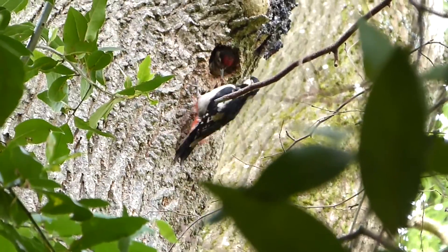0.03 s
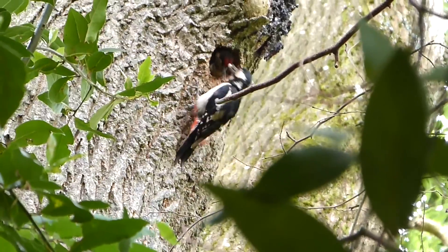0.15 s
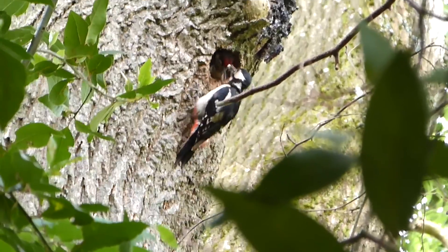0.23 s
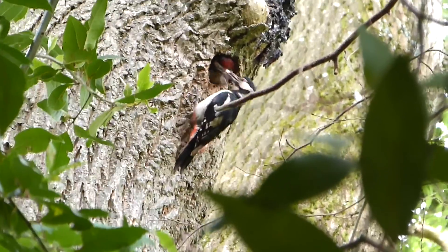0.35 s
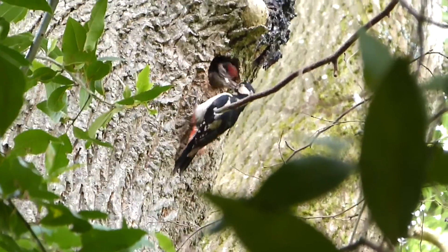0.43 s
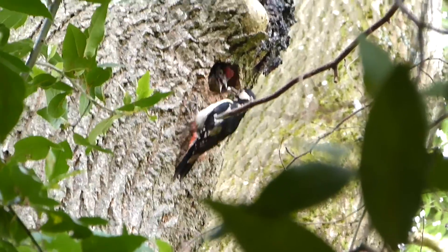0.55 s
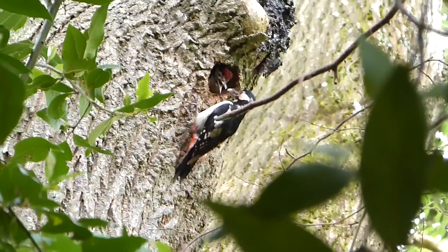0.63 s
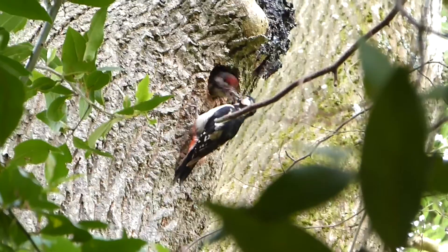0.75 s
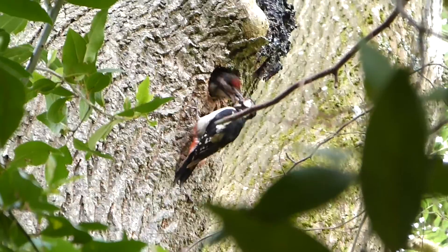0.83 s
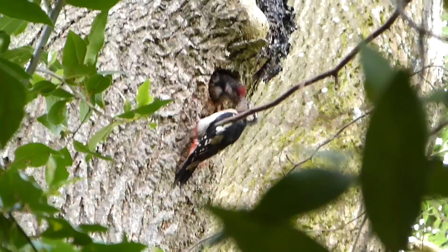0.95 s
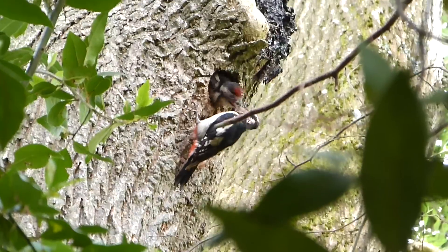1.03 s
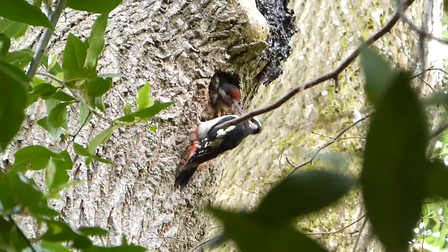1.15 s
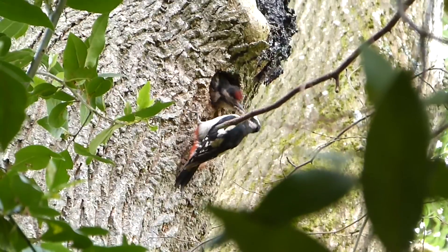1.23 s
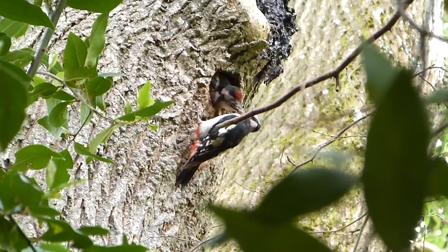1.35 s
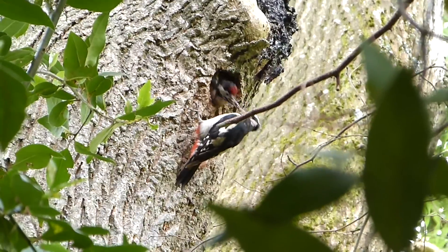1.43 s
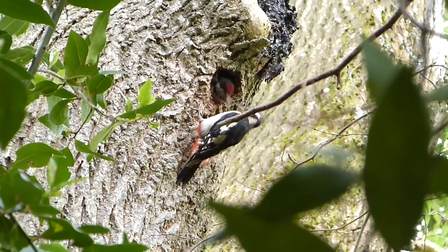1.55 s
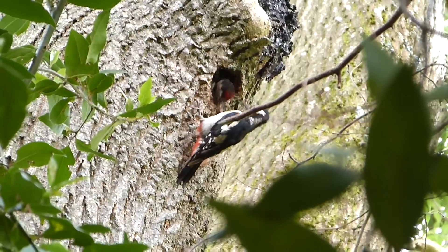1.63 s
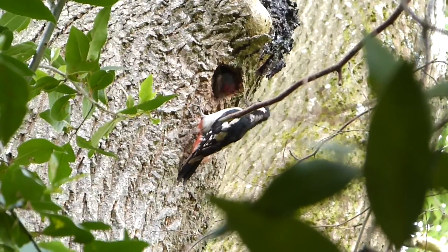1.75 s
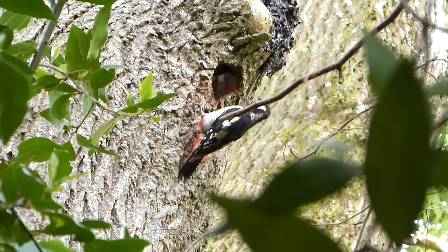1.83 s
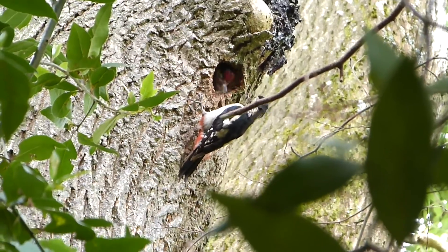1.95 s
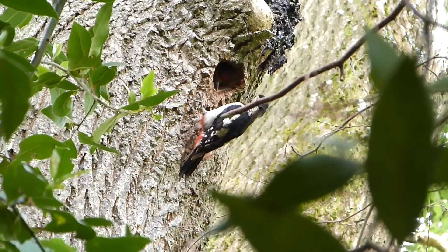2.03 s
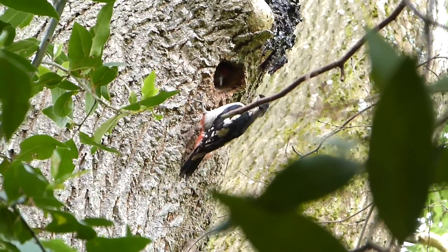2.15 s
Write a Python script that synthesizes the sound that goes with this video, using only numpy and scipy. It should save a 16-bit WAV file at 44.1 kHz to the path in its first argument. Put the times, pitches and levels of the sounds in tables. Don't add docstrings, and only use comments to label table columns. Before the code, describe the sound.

A woodpecker chick in a nest hole gives very short, bright, raspy squeaks from 0 to 1.3 seconds, about every 0.2 seconds, most led in by a faint croak and strongest near 0.6. A soft low pigeon coo sounds at 0.45-0.73. After a near pause, with thin high songbird whistles at 1.5-1.9, three weaker, lower squeaks follow from 1.75. Trunks echo lightly over steady leaf and distant traffic noise.

```python
import sys
import numpy as np
from scipy import signal
from scipy.fft import rfft, irfft
from scipy.io import wavfile

SR = 44100
rng = np.random.default_rng(int(sys.argv[2]) if len(sys.argv) > 2 else 0)


def volts(x):
    e = np.asarray(x, float) / 20
    return 10 ** e


def transcribe(signal):
    frames = np.atleast_2d(signal).T
    limited = np.clip(frames, -1, 1)
    pcm = np.round(limited * 32767).astype(np.int16)
    wavfile.write(sys.argv[1], SR, pcm)


N = 97020
LEAD = 4410
CUTOFF_HZ = 15600


def chick():
    # start_s, length_s, level_db, pitch_hz, fall (share of pitch)
    begs = [(-.034, 0.032, -23.5, 2410, 0.064), (.183, 0.04, -27.5, 2254, 0.031),
            (.382, 0.043, -20, 2414, 0.15), (0.587, .042, -15.5, 2456, 0.095),
            (0.806, .046, -17.5, 2353, 0.27), (1.022, 0.04, -19.5, 2359, .005),
            (1.270, 0.03, -23.5, 2296, 0.031), (1.516, 0.024, -42, 2600, 0.033),
            (1.541, 0.014, -38, 2900, 0.021), (1.758, 0.021, -25.5, 1730, 0.04),
            (1.912, .021, -29.5, 1821, 0.112), (2.058, 0.021, -30, 1700, 0.14)]
    # scoop (share of pitch, from below), throat_hz, width_octaves, rasp_db, left_right_db
    gapes = [(0.13, 6840, 0.22, -4.5, -0.5), (.2, 5740, 1, -7.5, -2.5), (0.38, 7300, 0.32, -12, -2),
             (0.21, 7500, 0.26, -9.5, -2), (.17, 5550, 0.28, -7.5, -2), (0.29, 5320, 0.3, -9, -2.5),
             (-0.2, 5960, 0.32, -18, -1.5), (-0.123, 3300, 0.62, -18, -2.5), (-.02, 6000, 0.34, -14, -2.5),
             (-.6, 5000, .35, -4, -4.5), (.0, 5200, .3, -7, -4.5), (.0, 5400, .45, -9, -4), ]
    # lowest_partial_db, other_partials_db
    chests = [(-18, -11), (-8.5, -15), (-9.5, -0.5), (-23, -11.5), (-23, -28), (-22.5, -26), (-20, -24),
              (-4.5, -11), (-20, -15), (-12.5, -19), (-11, -12.5), (-2, -14)]
    # start_s, length_s, level_db, pitch_hz, throat_hz
    croaks = [
        (0.144, 0.034, -42, 1353, 7000),
        (0.356, 0.034, -35.5, 1240, 7000),
        (0.558, 0.035, -35.5, 1250, 6350),
        (.781, 0.015, -27.5, 1314, 6600),
        (0.797, 0.0135, -29, 1330, 5730),
        (1.008, 0.017, -29.5, 1265, 6080),
        (1.746, 0.017, -40.5, 1104, 4800),
        (1.901, 0.018, -36.5, 1285, 6300),
        (2.047, .016, -44, 1293, 6260),
        (0.176, 0.02, -34.5, 2003, 8600),
    ]
    out = np.zeros((2, N + 2 * LEAD))
    for beg, gape, (chest_db, skirt_db) in zip(begs, gapes, chests):
        start, length, db, hz, fall = beg
        scoop, throat_hz, width, rasp_db, pan_db = gape
        call = squeak(length, db, hz, fall, scoop, throat_hz, width, rasp_db, chest_db, skirt_db)
        add(out, start, call, pan_db)
    for start, length, db, hz, throat_hz in croaks:
        croak = squeak(length, db, hz, fall=0.088, scoop=0.0293, throat_hz=throat_hz, width=0.39,
                       rasp_db=-5.5, chest_db=-7, skirt_db=-20)
        add(out, start, croak, pan_db=-2)
    return out


def squeak(length, db, hz, fall, scoop, throat_hz, width, rasp_db, chest_db, skirt_db):
    scoop_s, fall_power, jitter = 0.02, 7.0, 0.011
    flutter_db, flutter_hz, top_db_per_octave = 1.6, 220, -8
    nest_cut_hz, rasp_spread_db = 12500, -8
    t = np.arange(4000) / SR
    rise = scoop * np.maximum(1 - t / scoop_s, 0) ** 2
    drop = fall * np.minimum(t / length, 1.3) ** fall_power
    pitch = hz * (1 - rise - drop + jitter * drift(270, size=len(t)))
    pitch = np.maximum(pitch, hz / 2)

    def throat(f):
        octaves = np.log2(f / throat_hz + 1e-9)
        peak = np.exp(-0.5 * (octaves / width) ** 2) + volts(skirt_db)
        tilt = volts(top_db_per_octave * np.maximum(octaves, 0))
        return peak * tilt * (f < CUTOFF_HZ) / np.sqrt(1 + (f / nest_cut_hz) ** 10)

    phase = 2 * np.pi * np.cumsum(pitch) / SR
    tone = volts(chest_db) * np.sin(phase)
    for k in range(2, 11):
        flutter = volts(flutter_db * min(k - 1, 4) * drift(flutter_hz, size=len(t)))
        tone = tone + throat(k * pitch) * flutter * np.sin(k * phase)

    f = np.fft.rfftfreq(len(t), 1 / SR)
    spread = volts(rasp_spread_db) * (f > throat_hz) / (1 + (f / nest_cut_hz) ** 10)
    colour = (throat(f) + spread) * (f > hz * 0.7)
    rasp = irfft(rfft(rng.standard_normal(len(t))) * colour, len(t))

    shape = swell(t, length)
    tone_rms = np.sqrt(np.mean((tone * shape) ** 2) / np.mean(shape ** 2))
    return volts(db) * shape * (tone / tone_rms + volts(rasp_db) * rms_one(rasp))


def swell(t, length):
    attack_share, release_s = 0.4, 0.010
    attack = t / (attack_share * length)
    release = (length + release_s / 2 - t) / release_s
    return np.sin(np.pi / 2 * np.clip(np.minimum(attack, release), 0, 1)) ** 2


def drift(rate_hz, size):
    r, lead = np.exp(-2 * np.pi * rate_hz / SR), min(size // 10, 8000)
    wander = signal.lfilter([1], [1, -2 * r, r * r], rng.standard_normal(size + lead))
    return rms_one(wander[lead:])


def rms_one(x):
    return x / np.sqrt(np.mean(x ** 2) + 1e-20)


def add(out, start, sound, pan_db):
    i = int(start * SR) + LEAD
    out[:, i:i + len(sound)] += sound * volts([[pan_db / 2], [-pan_db / 2]])


def pigeon():
    # start_s, pitch_hz, level_db
    coo_course = [
        (.432, 356, -51),
        (0.462, 430.6, -30),
        (.476, 373, -36),
        (0.516, 416.5, -27.5),
        (.536, 496.5, -28),
        (0.641, 479.4, -29.5),
        (.655, 458.7, -26.5),
        (0.706, 441, -25.5),
        (0.73, 410, -41),
    ]
    s, hz, db = np.transpose(coo_course)
    t = np.arange(s[0], s[-1], 1 / SR)
    edge = np.clip(np.minimum(t - s[0], s[-1] - t) / 0.0062, 0, 1)
    level = volts(np.interp(t, s, db) + 1.5 * drift(29, size=len(t)))
    phase = 2 * np.pi * np.cumsum(np.interp(t, s, hz)) / SR
    out = np.zeros((2, N + 2 * LEAD))
    add(out, s[0], np.sqrt(2) * edge * level * np.sin(phase), pan_db=1.5)
    return out


def songbird():
    # start_s, length_s, level_db, pitch_hz
    seeps = [
        (1.49, 0.044, -50, 8700),
        (1.555, 0.023, -44, 8450),
        (1.735, 0.024, -54, 8250),
        (1.79, 0.08, -50.5, 8540),
    ]
    out, t = np.zeros((2, N + 2 * LEAD)), np.arange(4000) / SR
    for start, length, db, hz in seeps:
        pitch = hz * (1 - 0.21 * t + 0.0076 * drift(110, size=len(t)))
        whistle = np.sin(2 * np.pi * np.cumsum(pitch) / SR)
        add(out, start, volts(db) * swell(t, length) * whistle, pan_db=0)
    return out


def wood(x, wet_db, t60, near_db, wall_db):
    echoes_per_s, first_echo_s, near_t60_s, wall_s = 1500, 0.0048, 0.17, 0.038
    alike = 0.1
    t = np.arange(SR) / SR
    hits = rng.standard_normal((3, SR)) * (rng.random((3, SR)) < echoes_per_s / SR)
    echoes = np.sqrt(alike) * hits[0] + np.sqrt(1 - alike) * hits[1:]
    echoes = echoes * (t > first_echo_s)
    echoes = echoes * (volts(-60 * t / t60) + volts(near_db - 60 * t / near_t60_s))
    echoes = echoes / np.sqrt(np.sum(echoes ** 2, axis=1, keepdims=True))
    clear = np.roll(x, int(wall_s * SR), axis=1)
    scattered = signal.fftconvolve(x, echoes, axes=1)[:, :x.shape[1]]
    return x + volts(wall_db) * clear + volts(wet_db) * scattered


def at_hz(points, hz):
    return np.interp(np.log(hz), np.log(np.array(points)[:, 0]), np.array(points)[:, 1])


def garden(patchy_db):
    # frequency_hz, level_db (per Hz)
    leaves = [(76, -35), (130, -4), (798, -7), (1170, -10), (3160, -14), (7050, -20), (8370, -24),
              (12500, -39), (16200, -81), (22000, -120)]
    # frequency_hz, level_db (per Hz)
    traffic = [(20, -32), (65, -7.5), (115, -12), (250, -3.5)]
    # frequency_hz, left_right_likeness
    coherence = [(60, 0.93), (180, 0.98), (550, 0.95), (1640, 0.56), (4960, 0.45), (14900, 0.0076)]
    out, edges = 0, 20 * 2 ** np.arange(0, 9.7, 1 / 3)
    white, together = rng.standard_normal((2, 2, N + LEAD)), drift(0.67, size=N)
    for k, (low, high) in enumerate(zip(edges, edges[1:])):
        band = signal.butter(3, [low, high], "band", fs=SR, output="sos")
        mid, side = signal.sosfilt(band, white[k % 2])[:, LEAD:]
        hz = np.sqrt(low * high)
        alike = np.clip(at_hz(coherence, hz), -1, 1)
        flicker_db = patchy_db * (0.5 * together + drift(8.6, size=N))
        gain = volts(at_hz(traffic + leaves[2:], hz) + flicker_db)
        out = out + gain * (np.sqrt(1 + alike) * mid + np.sqrt(1 - alike) * side * [[1], [-1]])
    return volts(-39.5) * rms_one(out)


def scene():
    birds = wood(chick() + songbird(), wet_db=-4.5, t60=0.55, near_db=11.5, wall_db=-24)
    birds = birds + wood(pigeon(), wet_db=-16, t60=1, near_db=-25, wall_db=-10.5)
    size, left_lag_s = birds.shape[1], 0.000025
    delay = np.exp(-2j * np.pi * np.fft.rfftfreq(size, 1 / SR) * left_lag_s)
    birds[0] = irfft(rfft(birds[0]) * delay, size)
    return birds[:, LEAD:LEAD + N] + garden(patchy_db=1.9)


def band_limit(x):
    return signal.sosfilt(signal.butter(12, 15540, fs=SR, output="sos"), x)


def record(dry):
    low_pass = signal.cheby2(10, 60, CUTOFF_HZ, fs=SR, output="sos")
    mix = signal.sosfilt(low_pass, dry)
    return band_limit(mix)


dry = scene()
out = record(dry)
transcribe(out)
```